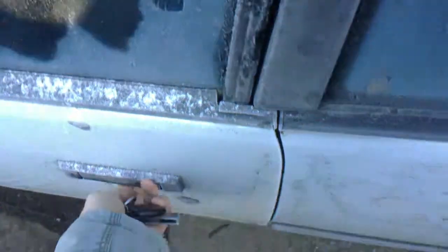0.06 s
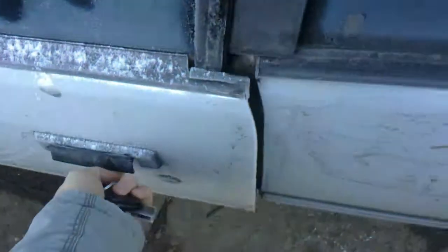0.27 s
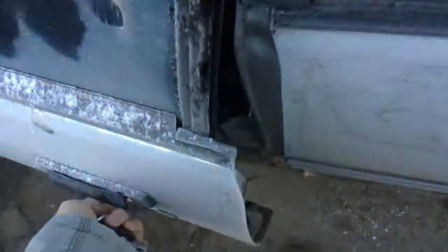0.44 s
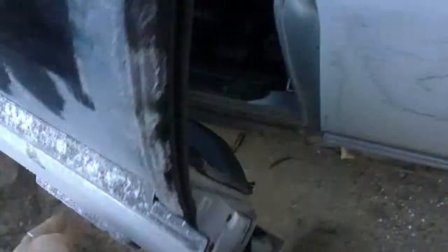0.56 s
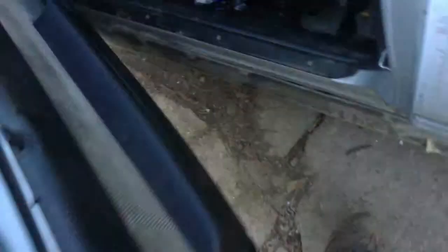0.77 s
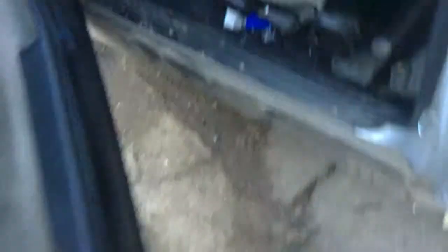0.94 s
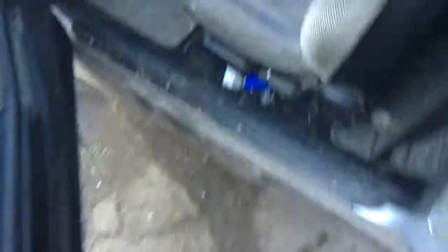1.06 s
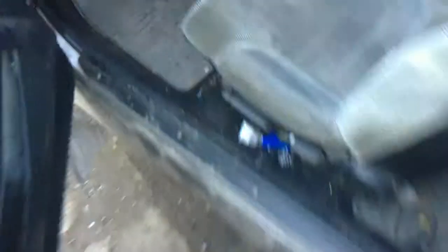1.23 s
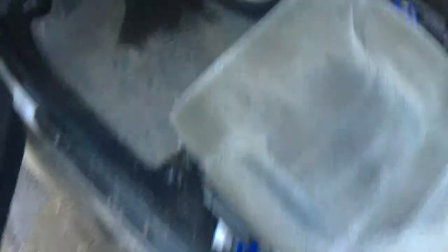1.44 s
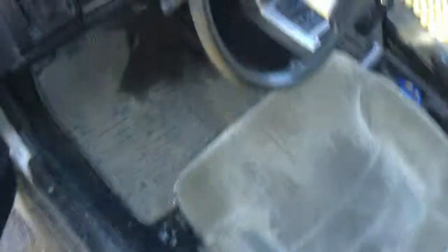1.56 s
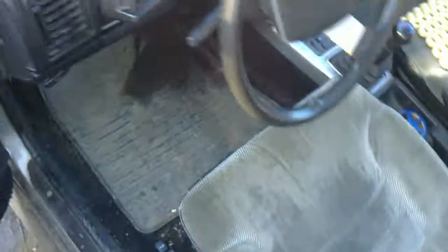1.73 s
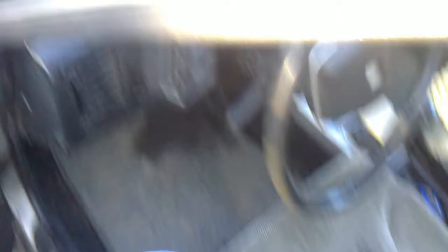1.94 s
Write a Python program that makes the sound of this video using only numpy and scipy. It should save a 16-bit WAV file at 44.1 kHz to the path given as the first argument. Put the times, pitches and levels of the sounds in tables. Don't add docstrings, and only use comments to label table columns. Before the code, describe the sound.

A car door handle is pulled and the latch clacks open, then a sleeve rustles softly outdoors

```python
import sys
import numpy as np
from scipy import signal
from scipy.fft import rfft, irfft
from scipy.io import wavfile
from scipy.ndimage import uniform_filter1d

SR = 44100
rng = np.random.default_rng(int(sys.argv[2]) if len(sys.argv) > 2 else 0)


def to_wav(s):
    ch = np.atleast_2d(s).T
    pcm = np.round(np.clip(ch, -1, 1) * 32767)
    wavfile.write(sys.argv[1], SR, pcm.astype(np.int16))


def gain_from_db(level_db):
    decades = np.asarray(level_db, float) / 20
    return 10 ** decades


N = 88200


def evened(x):
    return x / np.sqrt(np.mean(x ** 2) + 1e-20)


def add(mix, start_s, sound):
    part = mix[round(start_s * SR):][:len(sound)]
    part += sound[:len(part)]


def slow(rate_hz):
    hz = np.fft.rfftfreq(N, 1 / SR)
    smooth = (hz > 0) / (1 + (hz / rate_hz) ** 4)
    return evened(irfft(rfft(rng.standard_normal(N)) * smooth, N))


def coloured(x, points):
    hz = np.fft.rfftfreq(N, 1 / SR)
    f, db = np.transpose(points)
    gain_db = np.interp(np.log(hz + 1), np.log(f + 1), db)
    return evened(irfft(rfft(x) * gain_from_db(gain_db), N))


def air():
    # f/Hz, level/dB
    air_colour = [(20, -5.5), (60, -0.5), (250, -6.5), (700, -11), (2000, -14.5), (3500, -17), (7500, -13),
                  (11000, -25), (16000, -19.5)]
    patch_db, swell_db, air_db = 1.12, 1.1, -61
    noise = coloured(rng.standard_normal(N), air_colour)
    _, _, z = signal.stft(noise, SR, nperseg=1024, noverlap=768)
    patches = uniform_filter1d(rng.standard_normal(z.shape), 12, 0)
    patches = evened(uniform_filter1d(patches, 12, 1))
    hiss = signal.istft(z * gain_from_db(patch_db * patches), SR, nperseg=1024, noverlap=768)[1][:N]
    return gain_from_db(air_db + swell_db * np.tanh(slow(9.9))) * evened(hiss)


def wind_and_grip():
    wind_db, wind_hz, lump_db = -79, 71.4, 1
    grip_db, grip_until_s = 10, 0.53
    grip = grip_db / (1 + (np.arange(N) / SR / grip_until_s) ** 8)
    return gain_from_db(wind_db + grip + lump_db * slow(2.3)) * slow(wind_hz)


def cloth():
    # t/s, level/dB
    rustle = [(0, -65), (.55, -71), (.66, -56), (.77, -59), (.82, -69), (1.143, -61.5), (1.162, -52.5),
              (1.186, -60), (1.33, -62), (1.36, -55.5), (1.39, -57), (1.45, -51.5), (1.48, -50.5),
              (1.51, -55), (1.54, -60), (1.62, -69), (1.85, -61.5), (2, -61.5)]
    # f/Hz, level/dB
    cloth_colour = [(100, -16.5), (300, -6.5), (1000, -2.5), (2500, -8.5), (5200, -5.5), (8000, -2.5),
                    (11000, -13), (16000, -14)]
    fibres_per_s, fibre_db = 3500, 1.5
    caught = rng.random(N) < fibres_per_s / SR
    strength = gain_from_db(fibre_db * np.minimum(rng.exponential(1, N), 4))
    snaps = caught * strength * rng.standard_normal(N)
    rub = 0.478 * rng.standard_normal(N)
    s, db = np.transpose(rustle)
    movement_db = np.interp(np.arange(N) / SR, s, db) + 2 * np.tanh(slow(57))
    return coloured(snaps + rub, cloth_colour) * gain_from_db(movement_db)


def tap(db, hz, cycles):
    t = np.arange(-4000, 4000) / SR
    return gain_from_db(db) * np.sin(2 * np.pi * hz * t) * np.exp(-(2 * t * hz / cycles) ** 2)


def taps(rows):
    lead_s = .1
    layer = np.zeros(N + SR)
    for start_s, db, hz, cycles in rows:
        add(layer, start_s - 4000 / SR + lead_s, tap(db, hz, cycles))
    return layer[round(lead_s * SR):][:N]


def loose_ticks():
    # t/s, level/dB, f/Hz, length/cycles
    ticks = [(.388, -43, 2100, 1.6), (.388, -45, 6000, 2), (.412, -49, 7200, 6), (.313, -43, 4500, 4),
             (1.013, -48, 580, 1.5), (1.076, -54, 500, 1.6), (1.163, -50, 700, 2), (1.196, -52, 1250, 3),
             (1.242, -58, 700, 1.6), (1.258, -47, 380, 1.4), (1.362, -41, 300, 1.6), (1.819, -49, 3400, 4),
             (1.907, -47, 1050, 1.8), (1.951, -44, 2000, 2.6), (1.951, -42, 3500, 3),
             (1.459, -51, 650, 1.2), (.215, -44, 50, 1.6), (.295, -50, 50, 2.2), (.525, -50, 65, 1.3),
             (.085, -56, 60, 1.4), (1.371, -52, 330, 2), (1.233, -57, 450, 1.5), (1.172, -54, 550, 2),
             (.425, -58, 155, 3), (.130, -58, 270, 2.1), (1.41, -57, 38, 2.2), (1.09, -58, 75, 2.2),
             (1.79, -56, 600, 2.5), (1.52, -56, 230, 3), (.385, -58, 140, 3), (.468, -52, 150, 2),
             (.79, -56, 500, 3), (.669, -44, 480, 3.5), (.728, -54, 700, 1.2)]
    return taps(ticks)


def skin_knocks():
    # t/s, level/dB, f/Hz, length/cycles
    knocks = [(0.181, -47.5, 266, 3.2), (.214, -39, 390, 4.4), (.275, -37, 270, 2.7),
              (.292, -33.5, 196.3, 3.66), (.315, -42, 234, 2.65), (.343, -49, 155, 3.13),
              (.355, -45, 299.5, 2.75), (.355, -47, 1093, 2.83), (.540, -38.5, 676, 3.42),
              (.550, -42, 550, 6), (.578, -36, 430, 3.9), (.597, -40.5, 552, 4.5),
              (.609, -37.5, 254.3, 2.58), (.621, -38, 193.5, 2.74), (0.661, -44.5, 200.5, 2.64),
              (0.677, -50.5, 149.2, 2.2), (.74, -55, 219.1, 24.8), (0.611, -41, 1194, 6.5)]
    return taps(knocks)


def metal_spikes():
    # t/s, level/dB, f/Hz, length/cycles
    spikes = [(.5668, -18, 4550, 9), (.5667, -23, 6000, 7), (.5668, -27, 8000, 8), (.5667, -26, 1900, 2.5),
              (.5668, -31, 12500, 6), (.2726, -25, 8500, 5), (.2728, -30, 13000, 8), (.2140, -27, 2900, 3),
              (.2160, -29, 4300, 4), (.2542, -38, 6800, 5), (.2050, -28, 5200, 3), (.5385, -35, 4800, 5),
              (1.478, -47, 5200, 14), (1.294, -53, 1300, 2), (1.294, -54, 4000, 3)]
    return taps(spikes)


def crowd(t, lo_hz, hi_hz, db, t60):
    band = signal.butter(2, [lo_hz, min(hi_hz, SR / 2.1)], "band", fs=SR, output="sos")
    return evened(signal.sosfilt(band, rng.standard_normal(len(t)))) * gain_from_db(db - 60 * t / t60)


def short_snaps():
    # t/s, low f/Hz, high f/Hz, level/dB, 60 dB fade/s
    snap_table = [(0.24, 3500, 15000, -57, 0.018), (.2128, 1700, 4200, -28, 0.03),
                  (.2722, 7000, 11000, -27, 0.025), (.278, 7200, 16000, -37.5, 0.037),
                  (0.5585, 3800, 8700, -48, 0.038), (.5685, 3200, 4300, -30, 0.04),
                  (.566, 6200, 20000, -40, 0.031), (.533, 9000, 16000, -46, .04),
                  (1.9505, 5500, 10300, -46, 0.011), (1.293, 900, 6000, -54, 0.018),
                  (1.154, 1500, 10000, -50, .02), (1.160, 1000, 9000, -48, .03),
                  (1.168, 1500, 10000, -48, .02), (1.194, 900, 9000, -51, .025),
                  (1.437, 4000, 9000, -48, .04), (1.474, 4500, 14000, -46, .06),
                  (1.503, 5000, 9000, -49, .03), (1.254, 1500, 9000, -54, .02),
                  (1.078, 3000, 8000, -52, .01), (.575, 3200, 7500, -36, .02)]
    layer = np.zeros(N)
    for start_s, *band in snap_table:
        add(layer, start_s, crowd(np.arange(4000) / SR, *band))
    return layer


def ring(modes, dense, t):
    spread_db, detune = 2.2, .012
    hz, db, t60 = np.transpose(modes)[:, :, None]
    luck = rng.standard_normal((2, len(modes), 1))
    fade = gain_from_db(db + spread_db * luck[0] - 60 * t / t60)
    tones = fade * np.sin(2 * np.pi * hz * (1 + detune * luck[1]) * t)
    return (tones.sum(0) + crowd(t, *dense)) / np.sqrt(len(modes))


def chatter(rattle_s):
    clicks_per_s, click_db, first = 1800, 2, 5.3
    u = np.arange(1400) / SR
    draw = rng.random((2, 1400))
    strength = gain_from_db(-click_db * np.log(draw[1] + .1))
    clicks = (draw[0] < clicks_per_s / SR) * strength * np.exp(-(u / rattle_s) ** 2)
    clicks[0] = first
    return clicks * rng.choice([-1., 1.], 1400) / np.linalg.norm(clicks)


def blow(start_s, panel_db, link_db, metal_db, rattle_s):
    # f/Hz, level/dB, 60 dB fade/s
    panel = [(153.4, -7.5, 0.199), (206.2, 1, 0.148), (216.13, -9.5, 0.698), (263.4, -2.5, 0.165),
             (366.75, 1, 0.128), (409.3, -5, 0.176), (505.5, -8, 0.099), (610, -12, 0.127)]
    linkage = [(718.8, -13.5, 0.286), (862.7, -3.5, 0.075), (997, -13.5, 0.117), (1119.7, -0.5, 0.0955),
               (1288.3, 5.5, 0.063), (1377.3, 2, 0.076), (1557.5, -3, 0.179), (1647, 0.5, 0.092),
               (1825.4, -4, 0.109), (1996.4, -5.5, 0.138), (2318, -17.5, 0.03)]
    metal = [(3100, -12, .05), (3800, -7, .06), (4390, -8, .06), (4900, -10, .06), (5670, -11, .05),
             (6040, -11, .05), (6500, -12, .05), (6900, -12, .05), (7340, -8, .055), (8120, -11, .05),
             (8550, -12, .05), (9250, -17, .04)]
    # low f/Hz, high f/Hz, level/dB, 60 dB fade/s
    crowds = [
        (137.7, 682.5, 4.5, 0.1583),
        (625, 2800, 7.5, 0.0748),
        (3527, 7400, 9, 0.0765),
    ]
    # low f/Hz, high f/Hz, level/dB, 60 dB fade/s
    crack = (1777, 6740, 5.69, 0.0151)
    held_until_s, held_db_per_s, skin_rise_s = .4, 200, 0.00268
    t = np.arange(SR // 2) / SR
    clicks = chatter(rattle_s)
    held = gain_from_db(-held_db_per_s * t * (start_s < held_until_s))
    skin = gain_from_db(panel_db) * ring(panel, crowds[0], t) * (1 - np.exp(-t / skin_rise_s)) * held
    rods = gain_from_db(link_db) * ring(linkage, crowds[1], t)
    latch = gain_from_db(metal_db) * (ring(metal, crowds[2], t) + crowd(t, *crack))
    return skin + signal.fftconvolve(clicks, rods + latch)[:len(t)]


def door_blows():
    # t/s, skin level/dB, rods level/dB, latch level/dB, rattle length/s
    blow_table = [(0.147, -52, -57.5, -61, 0.0058), (.161, -45.5, -46.5, -59.5, 0.0135),
                  (0.168, -39.5, -50, -49, 0.0093), (0.183, -43.5, -47.5, -62, 0.0104),
                  (0.2048, -50.5, -30.5, -33.5, 0.00426), (0.2128, -25.5, -26.5, -36.5, 0.00352),
                  (.218, -31, -28.5, -36, 0.00904), (0.239, -35, -58, -49, 0.0155),
                  (0.253, -33.5, -39.5, -44, 0.0153), (0.272, -34, -34.5, -30.5, 0.0118),
                  (0.284, -40.5, -46.5, -37.5, 0.0071), (0.302, -39, -49, -48.5, 0.0237),
                  (0.329, -41, -55, -61.5, 0.007), (0.353, -46, -55, -80, 0.00122),
                  (0.467, -58.5, -84, -82, 0.0062), (0.501, -48.5, -65.5, -84, 0.024),
                  (0.5327, -41.5, -47, -43.5, 0.0063), (0.538, -41.5, -43, -40, 0.0034),
                  (0.5574, -66.5, -48.5, -46.5, 0.015), (0.5646, -61, -41.5, -37, 0.0028),
                  (0.5662, -51, -34, -32.5, 0.00224), (0.5746, -34.5, -30, -46, 0.00403),
                  (0.605, -39.5, -46.5, -53.5, 0.0165), (0.661, -41.5, -57, -78, 0.016),
                  (.727, -53, -61.5, -74, 0.0021)]
    layer = np.zeros(N)
    for start_s, *settings in blow_table:
        add(layer, start_s, blow(start_s, *settings))
    return layer


def scene():
    bass_cut = signal.butter(4, 97, "high", fs=SR, output="sos")
    door = signal.sosfilt(bass_cut, door_blows() + short_snaps())
    small_taps = loose_ticks() + skin_knocks() + metal_spikes()
    quiet = small_taps + cloth() + wind_and_grip() + air()
    edge_hz, edge_db = 15850, -40
    hz = np.fft.rfftfreq(N, 1 / SR)
    quiet = irfft(rfft(quiet) * gain_from_db(edge_db * (hz > edge_hz)), N)
    return (door + quiet)[None]


def roll_off(x):
    return signal.sosfilt(signal.butter(12, 16670, fs=SR, output="sos"), x)


def record(dry):
    notch_hz, notch_width_hz, notch_depth = 2720, 330, .45
    hz = np.fft.rfftfreq(N, 1 / SR)
    dip = 1 - notch_depth * np.exp(-((hz - notch_hz) / notch_width_hz) ** 2)
    heard = irfft(rfft(dry) * dip * (hz > 15) * (hz < 16600), N)
    return roll_off(heard)


dry = scene()
out = record(dry)
to_wav(out)
```